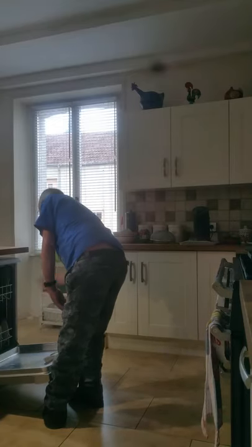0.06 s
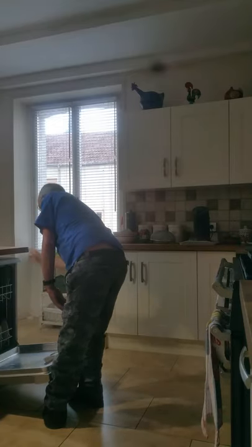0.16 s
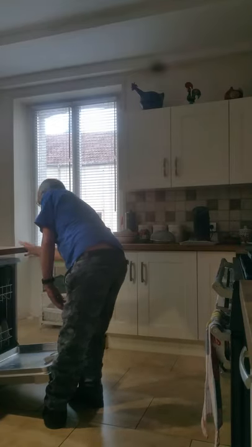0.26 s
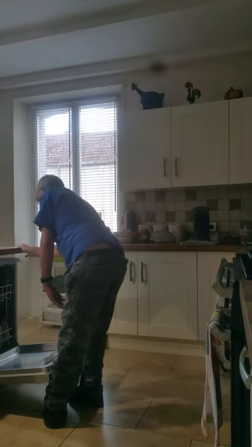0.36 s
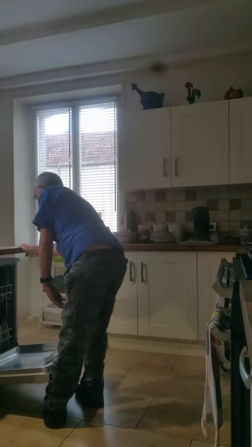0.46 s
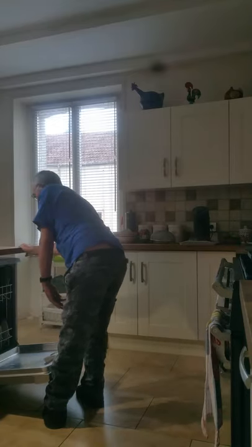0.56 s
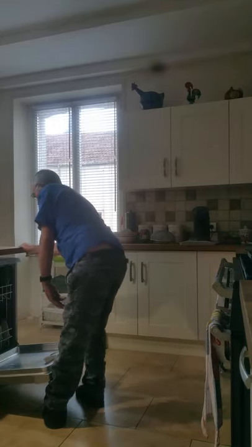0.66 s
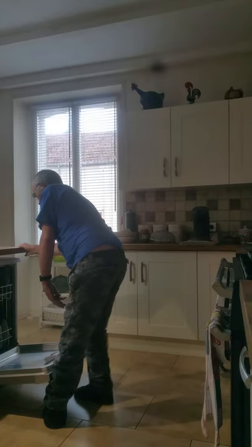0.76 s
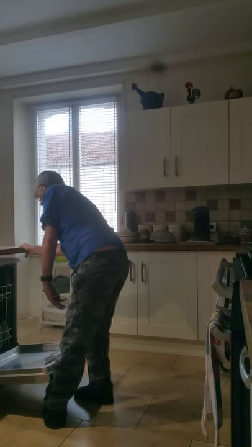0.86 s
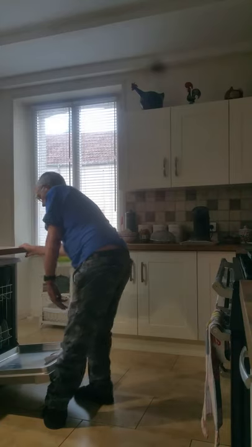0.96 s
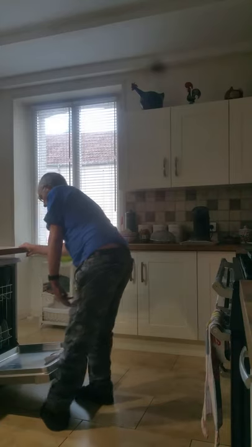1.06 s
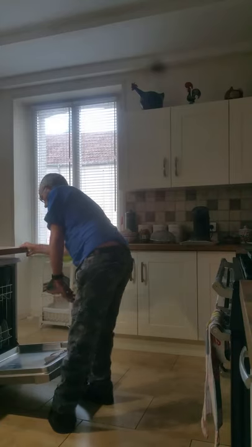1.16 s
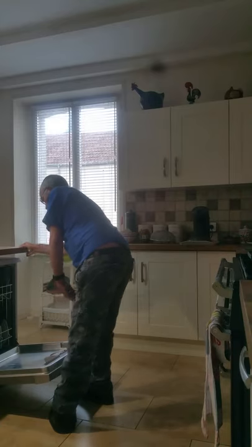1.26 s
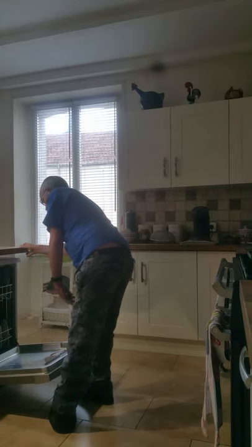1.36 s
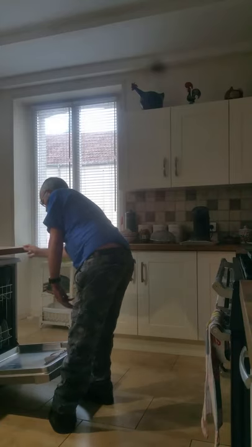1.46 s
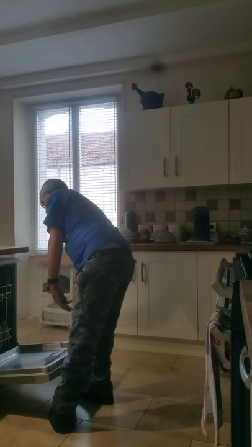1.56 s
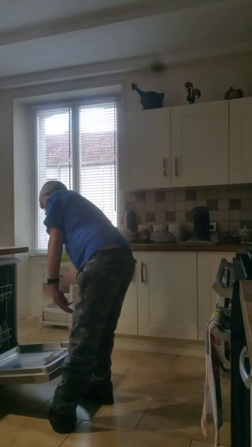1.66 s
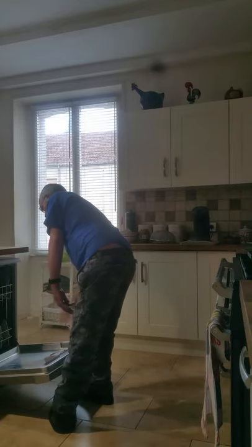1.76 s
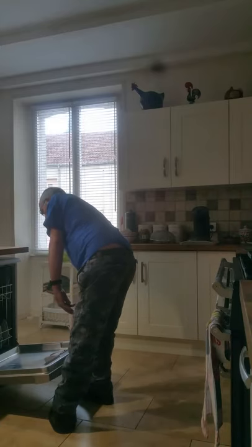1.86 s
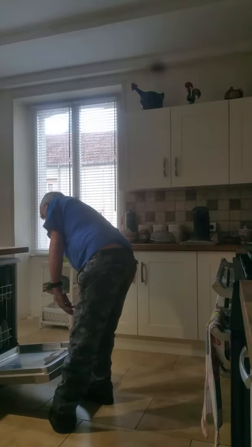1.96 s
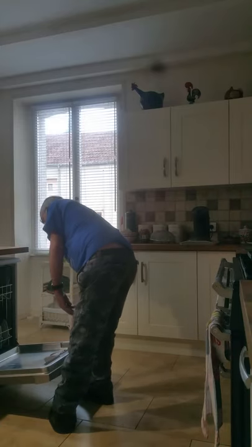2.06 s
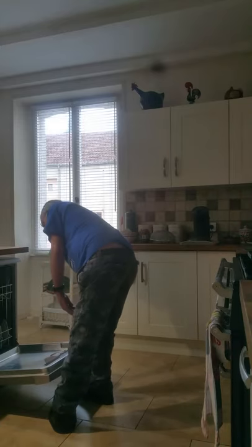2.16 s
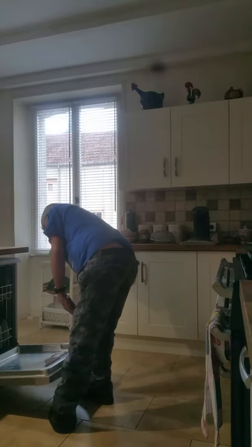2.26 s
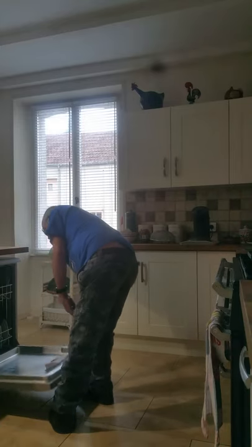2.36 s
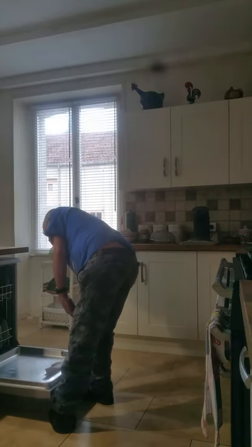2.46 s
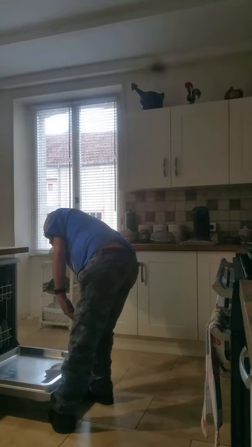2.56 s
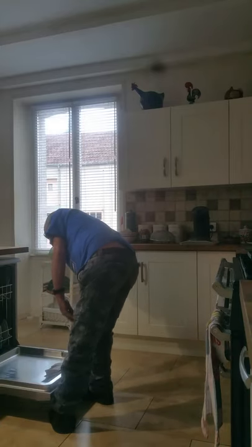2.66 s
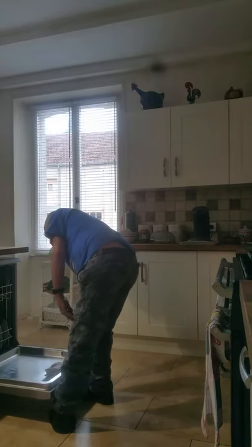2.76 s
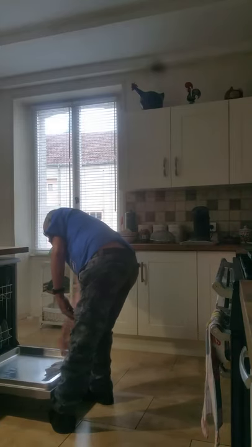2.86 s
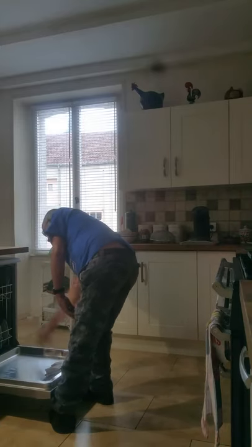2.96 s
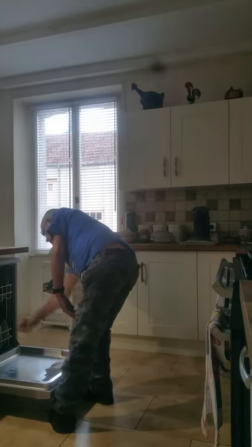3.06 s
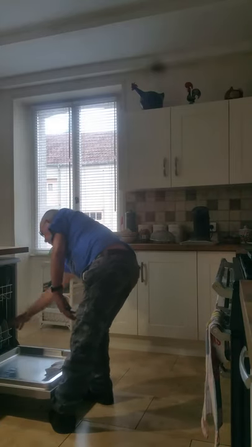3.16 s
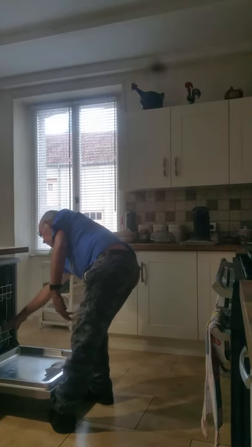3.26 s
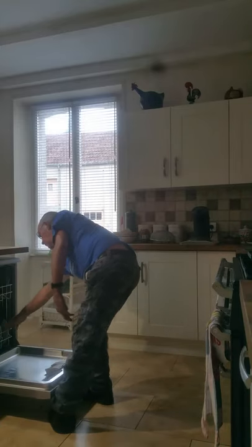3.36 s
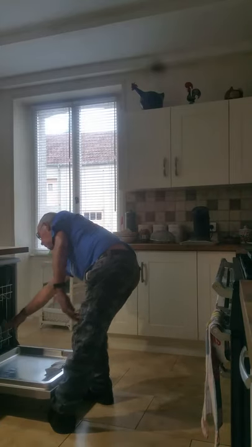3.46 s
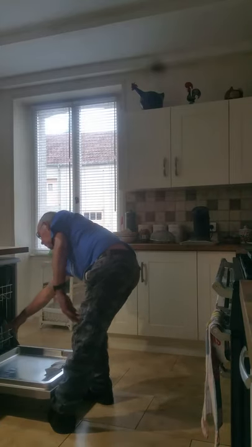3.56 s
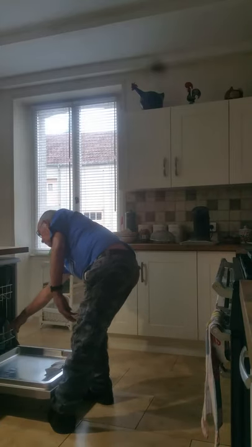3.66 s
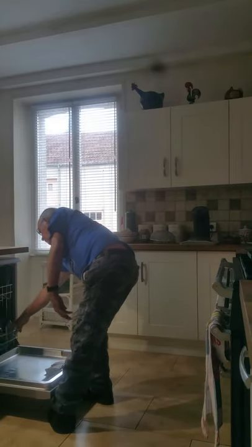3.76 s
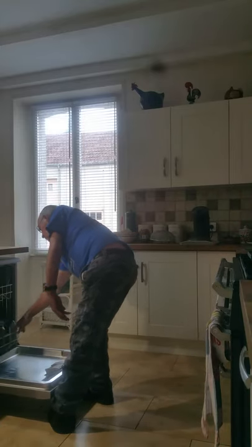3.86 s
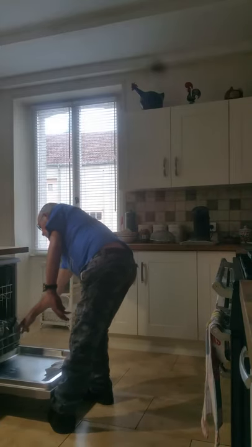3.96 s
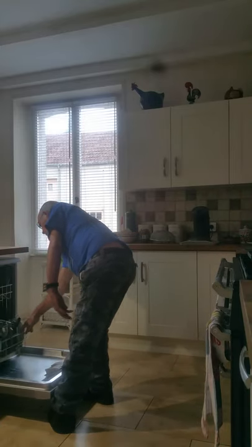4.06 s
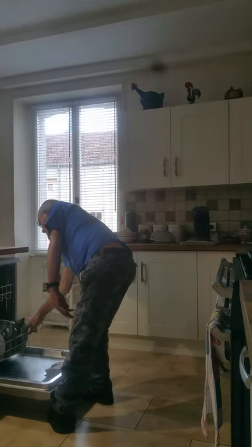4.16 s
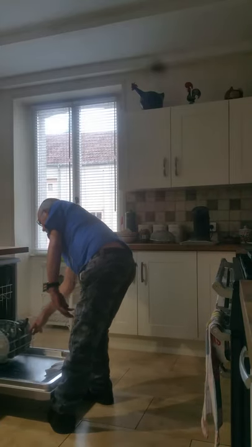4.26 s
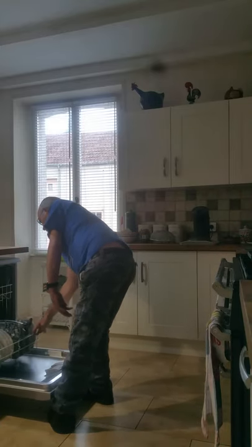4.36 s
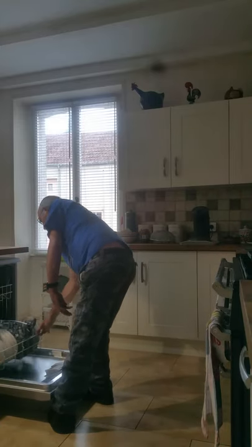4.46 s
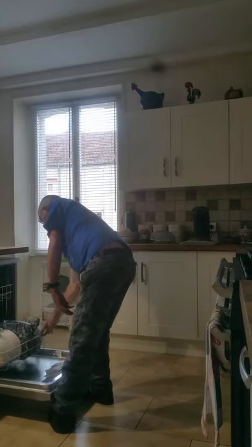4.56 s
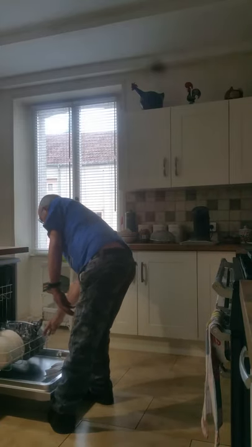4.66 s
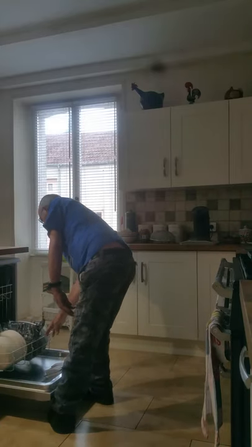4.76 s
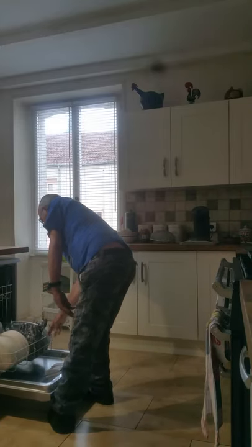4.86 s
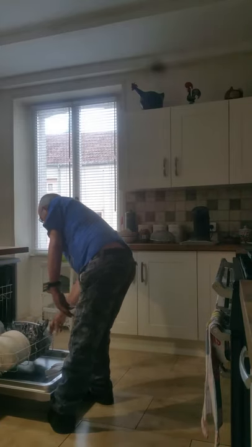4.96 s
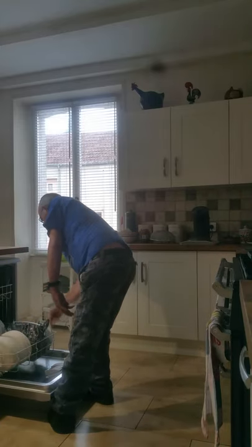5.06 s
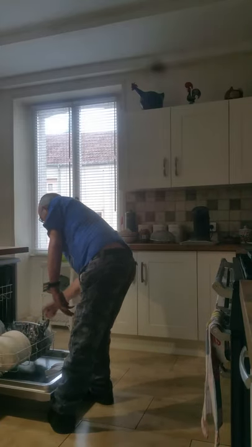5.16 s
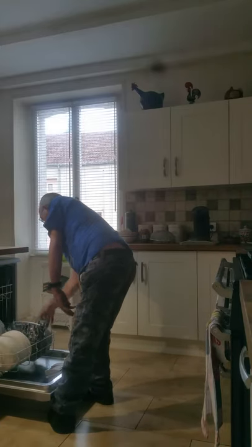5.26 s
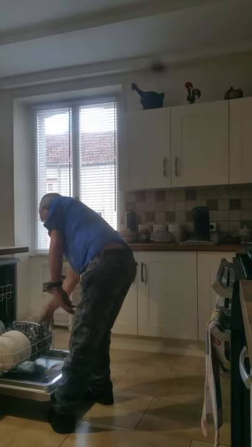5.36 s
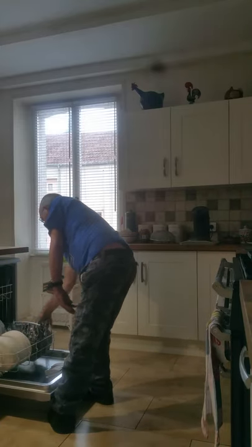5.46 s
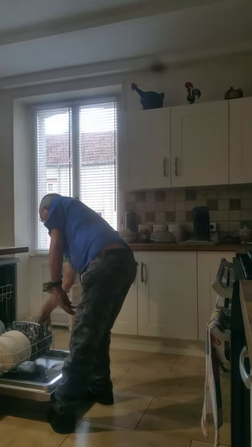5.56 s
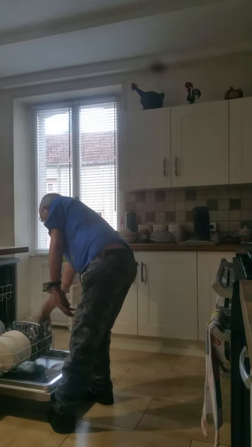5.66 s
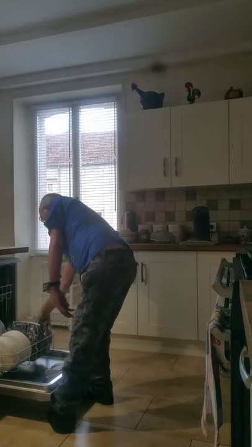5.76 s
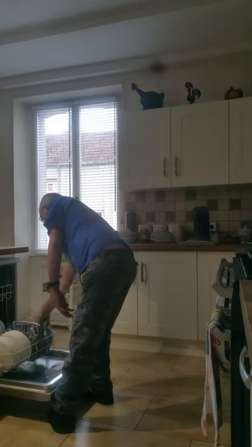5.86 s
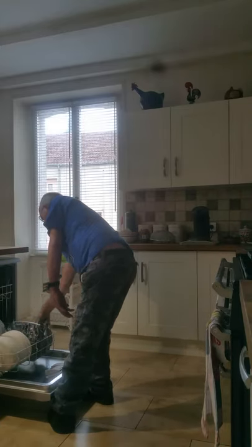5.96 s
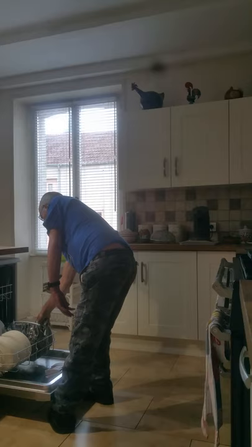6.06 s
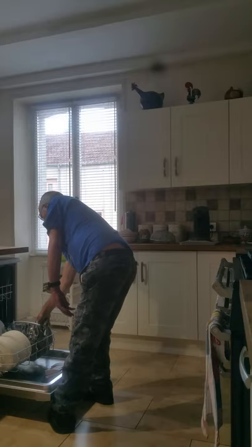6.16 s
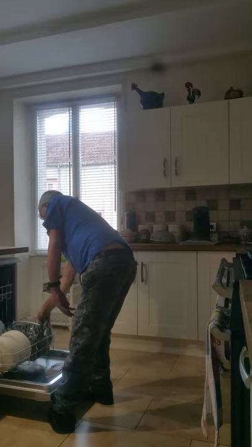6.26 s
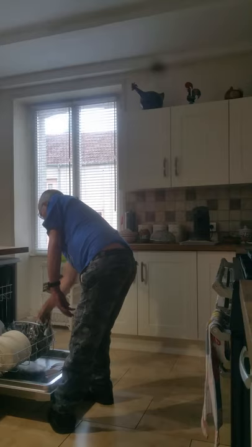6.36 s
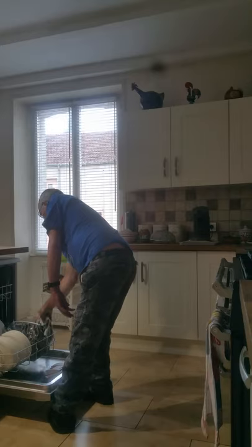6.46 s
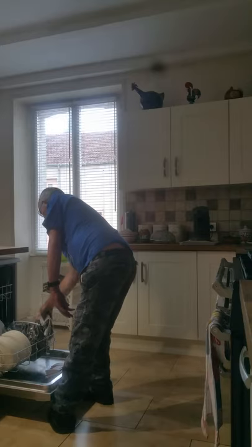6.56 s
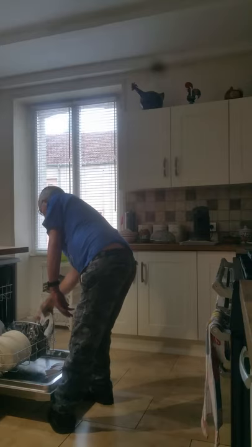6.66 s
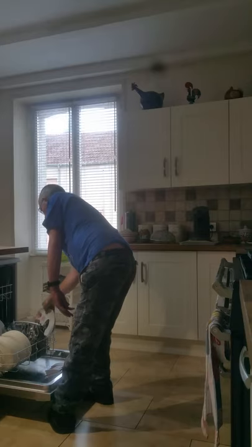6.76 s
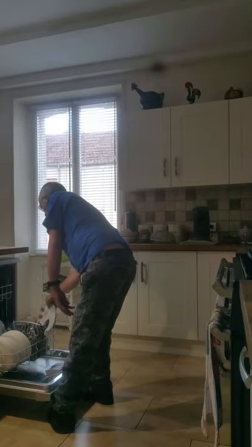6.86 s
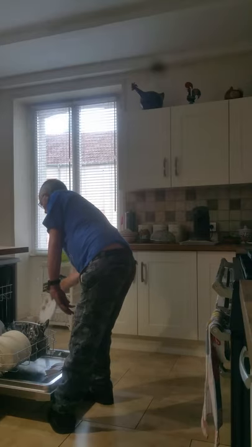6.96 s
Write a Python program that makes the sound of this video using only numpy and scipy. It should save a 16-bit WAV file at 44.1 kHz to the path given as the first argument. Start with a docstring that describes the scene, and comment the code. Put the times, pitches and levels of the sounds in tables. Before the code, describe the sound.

Scuffs and dull knocks, a sharp bump, a quiet gap, then a rattling dishwasher rack rolls out and crockery clinks brightly in an echoing kitchen.

```python
"""Someone works at an open dishwasher in a tiled kitchen. First shoes shuffle, and door and wire rack knock.
Then the rack rolls out, its load rattling and a roller groaning; dishes clink as they are lifted free.
Knocks, snaps, clinks and sliding are bursts of grit sent through the ringing pitches or tone colour of the parts.
Throughout, a thin high tone comes and goes, the hard room rings on for about half a second and booms
near 110 Hz, and two microphone ports hiss faintly."""
import sys
import numpy as np
from scipy import signal
from scipy.fft import rfft, irfft, next_fast_len
from scipy.io import wavfile

SR = 44100
rng = np.random.default_rng(int(sys.argv[2]) if len(sys.argv) > 2 else 0)


def wrap_up_sound(samples):
    """Save the sound to the file named by the first command line argument, as 16-bit audio."""
    columns = np.atleast_2d(samples).T
    # keep every value between -1 and 1, then stretch to whole-number steps
    tamed = np.clip(columns, -1, 1)
    steps = np.round(tamed * 32767).astype(np.int16)
    wavfile.write(sys.argv[1], SR, steps)


N = 309582
SIZE = next_fast_len(N + SR)   # room for the echo after the end
FREQ = np.maximum(np.arange(SIZE // 2 + 1) * SR / SIZE, 1)
TIME = np.arange(N) / SR


def from_db(db):
    """Gain of a level in dB."""
    return 10 ** (np.asarray(db) / 20)


def at_hz(points):
    """A (f/Hz, value) table read at every frequency of the spectrum."""
    hz, value = np.transpose(points)
    return np.interp(np.log(FREQ), np.log(hz), value)


def colour(x, gain):
    """Spectrum of x after a response scaled to keep the power of white noise."""
    return rfft(x, SIZE) * gain / np.sqrt(np.mean(np.abs(gain) ** 2))


def tinted(x, points):
    """Spectrum of x given the tone colour of a (f/Hz, level/dB) table."""
    return colour(x, from_db(at_hz(points)))


def resonances(modes, order=1):
    """Parts ringing side by side with alternating signs; order 2 swells in softly and has dark valleys."""
    total = 0
    for k, (hz, width, db) in enumerate(modes):
        damping = 1j * FREQ * width
        ring = damping / (hz ** 2 - FREQ ** 2 + damping)
        total = total + (-1) ** k * from_db(db) * ring ** order
    return total


def panel(modes):
    """Heavy parts meet through rubber and plastic, so their ringing gets little treble."""
    soft_contact_hz = 860
    return resonances(modes) / (1 + 1j * FREQ / soft_contact_hz) ** 2


def grit(spread_db):
    """A dense run of tiny contacts of uneven size; rms 1."""
    signs = rng.choice([-1, 1], N)
    sizes_db = spread_db * np.minimum(rng.exponential(1, N), 5)
    x = signs * from_db(sizes_db)
    return x / np.std(x)


def clicks(times, levels_db):
    """Single sharp blows, one sample long."""
    out = np.zeros(N)
    out[np.round(times * SR).astype(int)] = from_db(levels_db)
    return out


def chatter(times, levels_db, t60s, rises):
    """Strength of contact over time: each blow builds up and dies away as the parts settle."""
    power = np.zeros(N)
    t60s, rises = np.clip(t60s, .01, .5), np.clip(rises, .0003, .05)
    for s, db, t60, rise in np.broadcast(times, levels_db, t60s, rises):
        at = round(s * SR)
        t = np.arange(min(round(t60 * SR), N - at)) / SR
        decay = from_db(db - 60 * t / t60)
        build_up = 1 - np.exp(-(t / rise) ** 2)
        power[at:at + len(t)] += (decay * build_up) ** 2
    return np.sqrt(power)


# knocks on door, rack and tiles: t/s, strength/dB, extra weight on the frame/dB, hardness/dB, chatter t60/s
KNOCKS = [(0.001, -40.5, -4, 8, 0.031), (0.061, -39, -6, -5.5, 0.073), (0.118, -48, -13, 5.5, 0.058),
          (0.314, -47.5, 0, 6, 0.075), (0.402, -42.5, -8, 5.5, 0.038), (0.423, -39, -4, -2, 0.065),
          (0.501, -53, 1, 9, 0.11), (0.63, -48, -0.5, 1, 0.071), (0.739, -51, -12, -10, 0.11),
          (0.911, -45, -4.5, -4, 0.046), (1.151, -56, -6, 1, 0.22), (1.266, -23, 0.5, -1, 0.034),
          (2.203, -46.5, 13.5, 1, 0.039), (2.236, -57.5, 5, 6.5, 0.087), (2.357, -58, 23, 3, 0.068),
          (2.409, -51.5, 11, 1, 0.048), (2.585, -31.5, 9, 4, 0.068), (2.639, -31.5, 10, 6, 0.035),
          (2.708, -52, 4, 11, 0.031), (2.8, -52.5, -1, -3, 0.16), (2.92, -59, -18, 9, 0.044),
          (3.383, -44.5, -11, -4, 0.075), (3.585, -39, -7.5, -4, 0.14), (3.612, -26, -30, -1.5, 0.065),
          (3.65, -41.5, 0.5, 5.5, 0.12), (3.84, -45.5, -21, 4, 0.067), (3.928, -40, -18, 7.5, 0.041),
          (4.021, -28.5, -2, 12, 0.037), (4.053, -30.5, -8, 10.5, 0.098), (4.095, -29.5, 2.5, 10, 0.045),
          (4.16, -48, -2, 11, 0.048), (4.449, -34.5, 5, -14, 0.035), (4.642, -53, 2, -2, 0.054),
          (4.931, -46.5, 4, 0, 0.083), (5.047, -52, 6, -4, 0.039), (5.176, -48.5, -1, -10, 0.082),
          (5.227, -48.5, -5, -8, 0.05), (5.659, -39.5, 1, 11.5, 0.061), (5.672, -38, -1, 11.5, 0.055),
          (6.108, -34, -27, -4, .07), (6.145, -32, -15, -9, 0.055), (6.554, -36.5, 4, -4, 0.069)]
# a row each for tub, wires, clips and crack:
# level at the reference knock/dB, change per dB of strength/dB, change per dB of hardness/dB
KNOCK_PARTS = [(-40, 1.1372, 0.3834), (-46, 1.0249, 1.0176), (-58, 0.8062, 1.67), (-72.5, 0.5, 0.6)]
# what the cabinet frame rings with: f/Hz, width/Hz, level/dB
FRAME = [(206, 24.5, -3.5), (224.8, 20, 2), (260, 61, -4.5)]
# what the door panel rings with: f/Hz, width/Hz, level/dB
DOOR = [(331.2, 27, -3), (385.7, 40.4, -2.5), (457.8, 43, -3.5), (513, 42.5, -4.5), (624.4, 70, -5.5)]
# tone colour of the steel tub walls: f/Hz, level/dB (per Hz)
TUB = [(400, -23.5), (700, 2), (860, 5.5), (1200, 2), (1600, -0.5), (2500, -68.5)]
# tone colour of the rack wires: f/Hz, level/dB (per Hz)
WIRE = [(1000, -30), (1600, -2), (2200, -0.5), (3000, -5.5), (3800, -15.5), (5600, -23.5), (8000, -80)]
# tone colour of plastic clips and wheels: f/Hz, level/dB (per Hz)
TICK = [(2400, 0), (3300, 7), (4200, 1.5), (5000, -5.5), (5900, -15.5), (7000, -57)]
# tone colour of hard contact: f/Hz, level/dB (per Hz)
CRACK = [(3530, -34), (6000, -9), (7680, -8.5), (7970, -14), (9440, -10.5), (10400, -11), (15800, -13)]


def knocks():
    """One blow shakes frame and door panel; strength and hardness set how much the other parts join in."""
    s, db, weight_db, hard_db, t60 = np.transpose(KNOCKS)
    stronger_db = db + 40   # above the reference knock of -40 dB
    rise = 0.0035 * from_db(-0.2 * stronger_db)   # seconds; strong knocks build up faster
    tub_db, wire_db, tick_db, crack_db = [
        level + per_strength * stronger_db + per_hardness * hard_db
        for level, per_strength, per_hardness in KNOCK_PARTS]
    frame = colour(chatter(s, db + weight_db, t60, rise) * grit(3.0), panel(FRAME))
    door = colour(chatter(s, db, t60, rise) * grit(1.9), panel(DOOR))
    tub = tinted(chatter(s, tub_db, t60, rise) * grit(2.8), TUB)
    wire = tinted(chatter(s, wire_db, t60, rise) * grit(5.2), WIRE)
    tick = tinted(chatter(s, tick_db, t60, rise) * grit(7.2), TICK)
    crack = tinted(chatter(s, crack_db, 1.63 * t60, rise) * grit(2.9), CRACK)
    return frame + door + tub + wire + tick + crack


def dish(modes):
    """A dish rings at its pitches; the damped neighbour it meets adds a short clank at the same pitches."""
    clank = [(hz, 3.9 * width, db + 6) for hz, width, db in modes]   # wider means shorter
    return resonances(modes) + resonances(clank, order=2)


# dishes touching, one list per dish: t/s, ring level/dB, jolt to the rack/dB, chatter t60/s
CLINKS = [
    [(4.022, -29, -31.5, 0.064), (4.051, -20.5, -38, 0.075), (4.149, -27, -31, 0.048)],
    [(4.202, -19.5, -38, 0.056)],
    [(5.5214, -42.5, -65, 0.048), (5.5862, -50, -61, 0.09)],
    [(5.677, -28, -31, 0.09), (5.928, -20, -20, 0.062)],
    [(5.955, -14, -25, 0.045), (5.962, -14.5, -27, 0.042), (5.999, -34, -33, 0.043)],
    [(6.14, -17.5, -30, 0.048), (6.149, -19.5, -24.5, 0.034)],
    [(6.213, -20, -30, 0.048), (6.281, -21.5, -29.5, 0.06), (6.325, -34, -41, .034),
     (6.402, -40, -35.5, 0.08), (6.819, -27.5, -47, 0.095)],
    [(6.486, -23.5, -35, 0.058), (6.514, -29.5, -38, 0.12)],
    [(6.707, -21, -33, 0.032), (6.769, -29, -32, 0.056)],
    [(6.866, -28, -33, 0.093), (6.919, -32.5, -45, 0.05)],
]
# what each dish, or group of touching dishes, rings with, in the same order: f/Hz, width/Hz, level/dB
DISHES = [
    [(1110, 48, -1), (2330, 24, 0.5), (2570, 26, -1), (3226, 49, -0.5), (3280, 20, -23), (4020, 36, -7.5),
     (4700, 34, -30), (6550, 70, -38), (8360, 40, -35), (10000, 31, -29.5)],
    [(845, 30, 7), (1800, 56, -6), (2300, 48, 1.5), (2360, 81, -5), (2530, 99, 1.5), (3134, 37, -5),
     (4090, 61, -14), (5290, 42, -14.5)],
    [(1226, 15, 0), (2240, 73, -13.5), (2810, 93, -14), (3900, 68, -18), (4960, 51, -26)],
    [(1270, 18, -4.5), (1820, 78, -8), (2220, 290, -5.5), (2663, 62, 7), (3100, 23, 1), (3200, 31, -5),
     (4060, 67, -2.5), (5460, 53, -21)],
    [(1560, 33, 8.5), (1970, 78, -3), (2290, 46, -5), (2980, 114, 3.5), (3920, 59, -6.5), (4340, 140, -5.5),
     (5600, 79, -16), (6080, 39, -20), (7540, 150, -28), (11200, 120, -45), (12000, 43, -40),
     (13100, 31, -35)],
    [(1690, 21, -21), (2680, 85, -0.5), (2930, 33, 7.5), (3140, 50, 12.5), (3950, 48, -9), (9500, 35, -34),
     (11000, 14, -18), (12300, 31, -45)],
    [(1085, 45, 7), (1920, 48, 1), (2480, 78, -8), (3090, 144, -5.5), (4080, 360, -16.5), (4720, 42, -14),
     (5200, 32, -20), (6060, 27, -39), (7740, 160, -54)],
    [(1050, 12, -21), (1235, 12, -4.5), (2024, 45, 3.5), (2290, 36, -5), (2528, 26, -4), (2950, 160, -11.5),
     (3970, 69, -19)],
    [(1020, 41, 7), (1956, 79, 5.5), (3220, 135, 6.5), (3990, 88, 5.5), (5450, 160, -10.5), (6990, 45, -22),
     (7610, 92, -40), (9400, 51, -23), (10230, 48, -18.5), (11800, 29, -47)],
    [(905, 29, 6.5), (1870, 37, -4), (2270, 71, -1.5), (2527, 19, 4), (2730, 55, -33), (3300, 99, -7),
     (3926, 57, -1), (5560, 173, -29), (7060, 49, -20)],
]


def dishes():
    """A clink rings its dish, by a sharp touch and a short chatter, and jolts the rack beneath."""
    force, ringing = grit(6.0), 0
    for rows, modes in zip(CLINKS, DISHES):
        s, ring_db, jolt_db, t60 = np.transpose(rows)
        touch = clicks(s, ring_db + 17.5)
        rattle = force * chatter(s, ring_db - 5.0, t60, 0.0019)
        ringing = ringing + colour(touch + rattle, dish(modes))
    s, ring_db, jolt_db, t60 = np.transpose(sum(CLINKS, []))
    # harder clinks crack much louder; -22 dB is the reference
    crack_db = -45.5 + 1.9 * (ring_db + 22) + 0.95 * (jolt_db + 22)
    thud = colour(chatter(s, jolt_db + 1.5, t60, 0.0088) * grit(7.0), panel(FRAME + DOOR))
    rack_gain = from_db(at_hz(WIRE)) + from_db(at_hz(TUB) + 3) + from_db(at_hz(TICK) - 0.5)
    rack = colour(chatter(s, jolt_db, t60, 0.0035) * grit(4.5), rack_gain)
    crack = tinted(chatter(s, crack_db, 0.93 * t60, 0.0049) * grit(4.8), CRACK)
    return ringing + thud + rack + crack


# plastic clips and cutlery snapping or sliding: t/s, tick level/dB, crack level/dB, chatter t60/s
SNAPS = [(.125, -59, -57.5, 0.073), (.312, -53.5, -74, .1), (0.401, -44, -58.5, 0.082),
         (.5, -54, -70, 0.11), (.78, -52, -65, .2), (3.377, -43.5, -76, 0.076), (3.651, -41.5, -60, .08),
         (4.052, -38, -45.5, 0.097), (4.2, -35, -58, 0.076), (6.113, -33, -43, 0.067), (6.4, -43, -55, .08)]


def snaps():
    """Bright snaps with no weight behind them: only clips and hard contact sound."""
    s, tick_db, crack_db, t60 = np.transpose(SNAPS)
    rise_s = 0.0059
    tick = tinted(chatter(s, tick_db, t60, rise_s) * grit(6.0), TICK)
    crack = tinted(chatter(s, crack_db, t60, rise_s) * grit(3.2), CRACK)
    return tick + crack


# soles and cloth sliding, rack rolling, dishes handled; one curve a stretch: t/s, level/dB, brightness/dB
MOTION = [
    [(0.0, -38, -2.5), (.1, -67.5, -9), (.2, -74, 2), (.38, -59.5, -0.5), (.51, -92, -27), (.78, -56, 7.5),
     (.95, -66.5, 3), (1.2, -67.5, 11.5), (1.35, -64, 1), (1.55, -64.5, 2.5), (1.75, -77, -5)],
    [(2.2, -83, -1), (2.37, -63, -8), (2.6, -66, 5)],
    [(3.36, -68, 2), (3.56, -61, -7), (3.68, -59, -3), (3.8, -54, -0.5), (4.02, -52.5, 2.5),
     (4.2, -48, 2.5), (4.4, -48, -1), (4.6, -50.5, -1), (4.75, -58.5, 0), (4.95, -59, -4),
     (5.07, -62.5, -3), (5.18, -69, -7), (5.36, -88, -5)],
    [(5.45, -66.5, -2.5), (5.68, -73, 14), (5.76, -52, -7), (5.87, -68, 4), (6.0, -63, 15), (6.13, -49, 10),
     (6.27, -55.5, -14.5), (6.4, -46.5, 6.5), (6.55, -57.5, 1.5), (6.73, -42.5, -0.5), (6.86, -50.5, -2),
     (7.02, -55.5, -10)],
]


def motion_levels():
    """Gains of rumble, rub and swish, silent between the stretches; brightness trades rumble for swish."""
    out = np.zeros((3, N))
    for stretch in MOTION:
        s, level_points, bright_points = np.transpose(stretch)
        db = np.interp(TIME, s, level_points)
        bright_db = np.interp(TIME, s, bright_points)
        inside_s = np.minimum(TIME - s[0] + 0.065, s[-1] + 0.0044 - TIME)
        fade = np.clip(inside_s / 0.048, 0, 1)
        out += fade * from_db([db - bright_db, db, db + bright_db])
    return out


# tone colour of cloth and soles: f/Hz, level/dB (per Hz)
SWISH = [(1000, -77), (1700, 0.5), (2500, 0.5), (3500, -2), (4800, -13.5), (5900, -22.5), (8000, -31)]


def motion():
    """Sliding and rolling: gritty noise through frame, door panel and tub, and a bright swish."""
    rumble, rub, swish = motion_levels()
    return (colour(from_db(-8) * rumble * grit(5.2), panel(FRAME + DOOR))
            + tinted(from_db(-3.5) * rub * grit(1.5), TUB)
            + tinted(from_db(-7.5) * swish * grit(5.0), SWISH))


def tone(start, length, db, hz, fade_s):
    """A steady pure tone, faded in and out."""
    inside_s = np.minimum(TIME - start, start + length - TIME)
    return from_db(db) * np.clip(inside_s / fade_s, 0, 1) * np.sin(2 * np.pi * hz * TIME)


# a roller sticks and sings: t/s, level/dB, f/Hz, length/s
GROAN = [(4.348, -31.5, 338.3, 0.0395)]


def groan():
    """The short, steady note of a sticking roller."""
    return sum(tone(s, length, db, hz, 0.0095) for s, db, hz, length in GROAN)


# a thin high tone that comes and goes: t/s, length/s
PIPS = [(.69, 0.24), (1.64, 0.3), (2.618, 0.16), (3.67, 0.12), (4.748, .1), (5.112, .18), (5.7, 0.12),
        (6.714, .1)]


def pips():
    """The thin high tone: a very faint sine switched softly on and off."""
    return sum(tone(s, length, -88, 10950, 0.0069) for s, length in PIPS)


# weight landing on floor and door: t/s, level/dB (before the boosts below)
THUMPS = [(0.009, -47), (0.115, -48.5), (0.323, -47), (0.419, -35), (0.631, -62), (0.799, -68), (0.9, -61),
          (1.266, -44), (1.6, -59), (2.218, -49.5), (2.359, -47.5), (2.439, -58), (2.613, -36.5),
          (2.812, -60), (3.389, -61.5), (3.601, -40), (3.836, -50.5), (4.027, -42), (4.079, -39.5),
          (4.203, -63), (4.418, -54), (4.632, -51.5), (4.94, -53), (5.218, -62), (5.703, -48.5),
          (5.929, -47.5), (6.148, -51.5), (6.249, -59), (6.349, -52.5), (6.45, -51.5), (6.546, -50),
          (6.596, -49), (6.78, -56), (6.867, -55), (6.97, -54)]
# the bass stirring as weight shifts: t/s, level/dB (before the boost below)
STIR = [(0.0, -57), (0.15, -76), (0.37, -81), (0.58, -65.5), (1.02, -80.5), (1.74, -79), (2.13, -91),
        (2.79, -72), (3.13, -93.5), (4.28, -65), (5.36, -90), (5.92, -81), (6.78, -73), (7.02, -75)]
# lowest strong room resonances: f/Hz, width/Hz, level/dB (applied twice)
BOOM = [(88.3, 7.2, -4), (111.5, 15, 2.5)]
# floor and room bass: f/Hz, width/Hz, level/dB
SWAY = [(36, 19, -13.5), (60.6, 24, -17), (103.8, 30, -6.5)]


def boom():
    """Thumps swell in the lowest room modes and shake the floor; shifting weight keeps the bass stirring."""
    s, db = np.transpose(THUMPS)
    stir = from_db(np.interp(TIME, *np.transpose(STIR)))
    room = colour(clicks(s, db + 27.5), resonances(BOOM) ** 2)
    shaking = clicks(s, db + 15.5) + from_db(8.0) * stir * grit(3.8)
    return room + colour(shaking, resonances(SWAY, order=2))


# left port minus right port: f/Hz, level/dB
PORTS = [(60, -13), (110, 17.5), (200, 2), (380, -2.5), (700, -6.5), (1290, -1), (2380, -6.5), (4400, 2.5),
         (8120, 19.5), (15000, 8)]


def kitchen(spectrum):
    """Direct sound, reaching the left port first, then a dense tail whose treble dies sooner."""
    room_t60_s, treble_t60_s, early_t60_s, first_wall_s = 0.59, 0.48, 0.067, 0.0028
    room_db, bass_room_db, early_db = 5.5, -1.5, 3.5
    port_lag_s, shared_below_hz = 0.00044, 570
    t = np.arange(SR) / SR
    noise = rng.standard_normal((2, SR)) * np.clip(t / first_wall_s - 1, 0, 1)
    # tub, tiles and cabinets close by answer first
    noise = noise * (1 + from_db(early_db - 60 * t / early_t60_s))
    dull = signal.sosfilt(signal.butter(2, 5000, fs=SR, output="sos"), noise)
    tail = dull * from_db(-60 * t / room_t60_s) + (noise - dull) * from_db(-60 * t / treble_t60_s)
    tail = rfft(tail, SIZE) * np.sqrt(2 * np.log(1000) / room_t60_s / SR)
    lag = np.exp(-2j * np.pi * FREQ * port_lag_s * np.array([[0], [1]]))
    apart = (from_db(room_db) * tail + lag) / np.sqrt(1 + from_db(2 * room_db))
    together = 1 + from_db(bass_room_db) * tail[0]
    # long waves arrive alike at both ports
    shared = 1 / (1 + (FREQ / shared_below_hz) ** 6)
    paths = np.sqrt(shared) * together + np.sqrt(1 - shared) * apart
    return spectrum * paths * from_db(at_hz(PORTS) / 2 * np.array([[1], [-1]]))


# tone colour of room tone and port noise: f/Hz, level/dB (per Hz)
HISS = [(12, -53), (20, 2), (31, -13), (49, -15), (104, -14.5), (167, -13.5), (443, -16.5), (637, -17),
        (1020, -21), (1210, -19), (2960, -23.5), (5320, -29.5), (6110, -35), (10700, -29), (15800, -31.5)]


def hiss():
    """Steady noise, separate in each channel."""
    return tinted(from_db(-73 + 5.0) * rng.standard_normal((2, N)), HISS)


def scene():
    """Everything in the room, over the steady hiss."""
    sources = knocks() + snaps() + dishes() + motion() + rfft(groan() + pips(), SIZE)
    # dishes, rack and door are too small to give out deep bass: thin it below 104 Hz
    sources = sources / (1 + 104 / (1j * FREQ)) ** 2
    background = hiss()
    return irfft(kitchen(sources) + boom() + background, SIZE)[:, :N]


def record(dry):
    """The top is cut steeply at 16150 Hz; a small constant offset is added."""
    low_pass = signal.cheby2(20, 70, 16150, fs=SR, output="sos")
    return signal.sosfilt(low_pass, dry) - .0005


dry = scene()
out = record(dry)
wrap_up_sound(out)
```